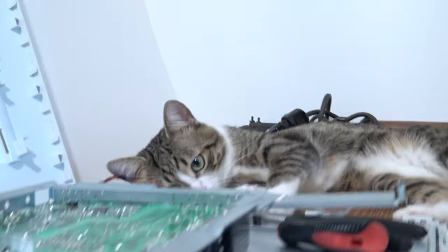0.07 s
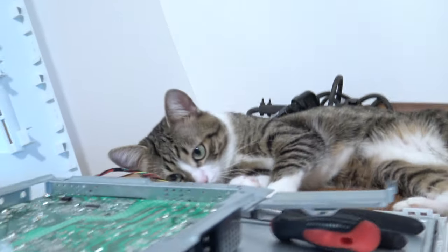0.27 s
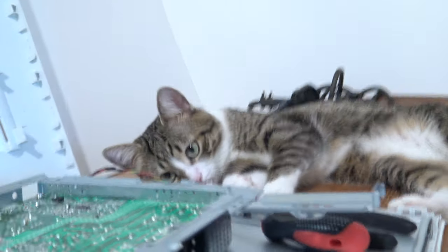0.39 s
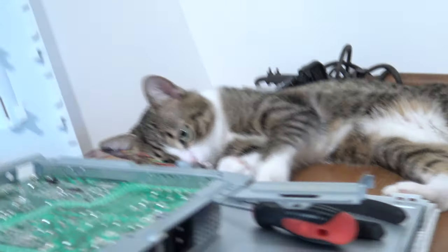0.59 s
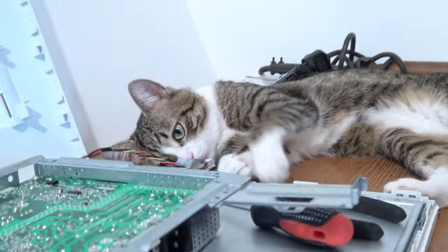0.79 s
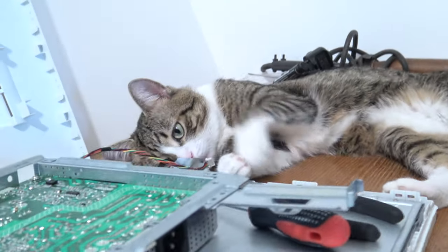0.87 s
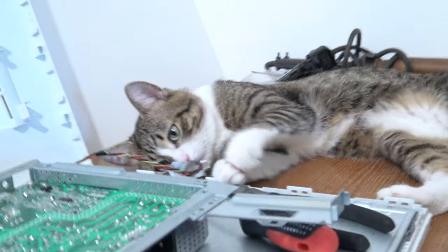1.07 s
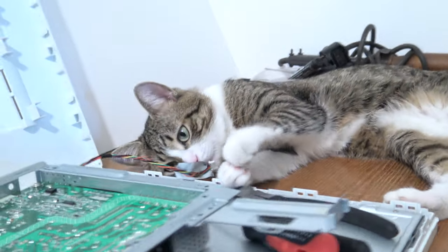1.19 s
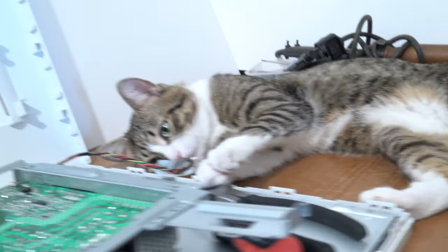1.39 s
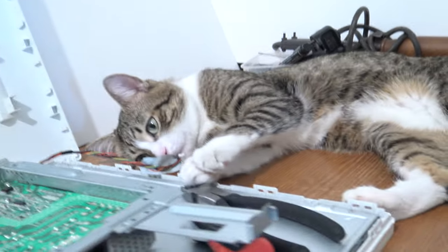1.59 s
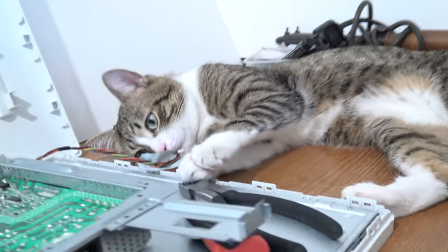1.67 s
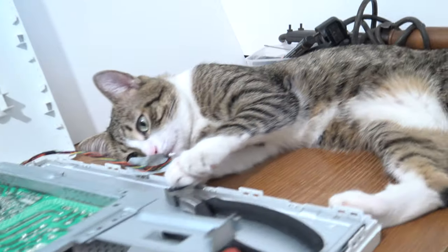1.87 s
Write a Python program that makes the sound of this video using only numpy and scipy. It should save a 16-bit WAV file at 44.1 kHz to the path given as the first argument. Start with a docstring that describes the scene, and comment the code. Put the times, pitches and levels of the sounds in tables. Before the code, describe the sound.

One sharp bright snap comes early, then faint claw ticks, a brief paw scuff, small bracket taps and a dull metal knock; a small quiet room, close microphone, faint lens motor whine in the first second.

```python
"""A cat lying on a wooden floor paws at the wires and sheet metal of an opened appliance, close by.
One sharp snap, claw ticks, bracket taps and chassis knocks: decaying modes and damped noise bursts.
Paw and fur rub as trains of tiny random slips; low decaying tones thump on the floor.
The small room answers with a decaying-noise response, over quiet shaped-noise room tone.
A lens motor whines faintly in pulses for the first second: gated harmonics of its step rate."""
import sys
import numpy as np
from scipy import signal
from scipy.fft import rfft, irfft
from scipy.io import wavfile
from scipy.ndimage import uniform_filter1d

SR = 44100
rng = np.random.default_rng(int(sys.argv[2]) if len(sys.argv) > 2 else 0)


def digitize_waveform(pressure):
    """Quantize a signal to 16-bit integers and store it at the path in sys.argv[1].

    Rows of a 2-D input are taken as channels; values are limited to [-1, 1].
    """
    field = np.atleast_2d(pressure).T
    bounded = np.clip(field, -1, 1)
    quanta = np.round(bounded * 32767).astype(np.int16)
    wavfile.write(sys.argv[1], SR, quanta)


N = 83790

SNAP_S = 0.2082
RADIATE = 0.84  # high-pass corner of a part / its lowest mode


def amp(db):
    """Decibels to gain."""
    return 10 ** (np.asarray(db) / 20)


def unit(x):
    """Scales to rms 1."""
    return x / np.sqrt(np.mean(x ** 2) + 1e-20)


def read(points, hz):
    """Interpolates a table on a log-frequency axis."""
    f, value = np.transpose(points)
    return np.interp(np.log(hz + 1), np.log(f + 1), value)


def coloured(x, points):
    """Filters a signal, zero phase, by a table of levels; rms 1."""
    gain = amp(read(points, np.fft.rfftfreq(len(x), 1 / SR)))
    return unit(irfft(rfft(x) * gain, len(x)))


def panned(x, pan_db):
    """Stereo from mono; pan_db is left minus right."""
    return amp([[pan_db / 2], [-pan_db / 2]]) * x


def widened(pair, side_db):
    """Left and right from a middle and a side signal, the side filtered by a table."""
    mid, side = pair
    gain = amp(read(side_db, np.fft.rfftfreq(len(side), 1 / SR)))
    side = irfft(rfft(side) * gain, len(side))
    return np.array([mid + side, mid - side])


def add(mix, s, sound):
    """Adds a stereo sound at a time in seconds."""
    part = mix[:, max(round(s * SR), 0):][:, :sound.shape[1]]
    part += sound[:, :part.shape[1]]


def decay(t, t60):
    """Exponential decay by 60 dB in t60 seconds."""
    return np.exp(-np.log(1000) * t / t60)


def radiated(x, modes, order):
    """A part hardly radiates below its lowest mode: high-pass."""
    sos = signal.butter(order, RADIATE * modes[0][0], "high", fs=SR, output="sos")
    return signal.sosfilt(sos, x)


def ring(modes, contact_s):
    """Exponentially dying modes that swell over the contact time."""
    t = np.arange(SR // 4) / SR
    swell = 1 - np.exp(-(t / contact_s) ** 2)
    return swell * sum(amp(db - 60 * t / t60) * np.sin(2 * np.pi * hz * t) for hz, db, t60 in modes)


def burst(centre_hz, octaves, t60):
    """A tiny crack: dense, heavily damped ringing around one frequency."""
    size, rise_s = 2048, 0.0001
    t, hz = np.arange(size) / SR, np.fft.rfftfreq(size, 1 / SR)
    offset = np.log2((hz + 1) / centre_hz) / octaves
    bell = 1 / (1 + offset ** 2 / 2) ** 2
    dense = unit(irfft(bell * np.exp(2j * np.pi * rng.random(len(hz)))))
    fade = (1 - np.exp(-t / rise_s)) * decay(t, t60)
    return unit(dense * fade) * np.sqrt(np.mean(fade ** 2))  # rms of the fade


def struck(blows, modes, pan_db):
    """Each blow rings the same modes of one part, shorter the more the paw damps it."""
    out = np.zeros((2, N))
    for s, db, contact_s, damping in blows:
        damped = [(hz, mode_db, t60 / damping) for hz, mode_db, t60 in modes]
        add(out, s, panned(amp(db) * ring(damped, contact_s), pan_db))
    return radiated(out, modes, order=4)


def slips(per_s, colour):
    """Many tiny slips of uneven size and random sign, coloured by what they shake."""
    spread_db = 2.5
    size = amp(spread_db * np.minimum(rng.exponential(1, N), 4))
    hit = rng.random(N) < per_s / SR
    return coloured(hit * rng.choice([-1., 1.], N) * size, colour)


def air():
    """Steady room tone and microphone hiss: coloured stereo noise."""
    level_db = -62.5
    # room tone: f/Hz, level/dB
    air_colour = [(20, -8.5), (50, -5.5), (100, -5.5), (200, -7), (300, -5.5), (380, -11), (500, -8.5),
                  (620, -11), (780, -7), (1070, -12.5), (1190, -5), (1340, -16.5), (2200, -19),
                  (5000, -22.5), (10000, -23.5), (15500, -27.5)]
    # side against middle: f/Hz, level/dB
    air_side = [(60, -17.5), (120, -8), (240, -8.5), (480, -9.5), (950, -11), (1890, -10.5), (3770, -19.5),
                (7520, -1), (15000, -12.5)]
    pair = [coloured(x, air_colour) for x in rng.standard_normal((2, N))]
    return amp(level_db) * unit(widened(pair, air_side))


def lens():
    """The lens motor steps in short, regular runs of uneven strength; its step rate jitters."""
    step_hz, jitter_rms = 1619, 0.0032  # jitter relative to step rate
    runs_per_s, first_s, spread_db = 24.7, 0.045, 2
    swell_s, stop_s = 0.16, 1.07
    # harmonics of the step rate: multiple, level/dB
    partials = [(4, -73.5), (5, -71.5), (6, -76.5)]
    t = np.arange(N) / SR
    cycle = runs_per_s * (t - first_s)
    strength = amp(spread_db * rng.standard_normal(size=64))[np.round(cycle).astype(int)]
    gate = np.cos(2 * np.pi * cycle) > 0
    runs = strength * gate * np.minimum(t / swell_s, 1) * (t < stop_s)
    jitter = jitter_rms * unit(uniform_filter1d(rng.standard_normal(N), size=100))
    turns = np.cumsum(step_hz * (1 + jitter)) / SR
    whine = sum(amp(db) * np.sin(2 * np.pi * k * turns) for k, db in partials)
    return uniform_filter1d(runs, size=150) * whine  # softened run edges


def room(x):
    """Scatter from the near clutter plus a short, nearly central tail, by convolution."""
    tail_db, early_db = -23, -20.5
    early_t60_s, early_delay_s = 0.091, 0.00275
    # tail decay: f/Hz, t60/s
    tail_t60 = [(200, 0.3), (1200, 0.45), (3500, 0.29), (7000, 0.29), (13000, 0.31)]
    # side against middle: f/Hz, level/dB
    room_side = [(150, -13), (900, -10), (2800, -17), (5000, -23.5), (8000, -16), (13000, -11.5)]
    hz, t, z = signal.stft(rng.standard_normal((2, SR // 2)), SR, nperseg=256)
    faded = z * decay(t, read(tail_t60, hz)[:, None])
    tail = signal.istft(faded, SR, nperseg=256)[1]
    t = np.arange(tail.shape[1]) / SR
    early = rng.standard_normal(tail.shape) * (t > early_delay_s) * decay(t, early_t60_s)
    response = amp(tail_db) * tail / np.linalg.norm(tail[0])
    response = response + amp(early_db) * early / np.linalg.norm(early[0])
    return signal.fftconvolve(x.mean(0)[None], widened(response, room_side), axes=1)[:, :N]


def ports(x):
    """Direct sound reaches two microphone ports with slightly different level and phase."""
    # left minus right: f/Hz, level/dB
    balance = [(200, 0.1), (1000, -0.5), (2500, 0.7), (5000, 0), (7000, -6), (9000, 0), (12500, -2)]
    # left's lead: f/Hz, phase/rad
    lead = [(200, 0.076), (6800, -0.24), (9000, -0.85), (13000, -0.85)]
    hz = np.fft.rfftfreq(N, 1 / SR)
    half = amp(read(balance, hz) / 2) * np.exp(.5j * read(lead, hz))
    return irfft(rfft(x) * np.array([half, 1 / half]), N)


def thumps():
    """The paw's weight lands on the wooden floor: soft, low decaying tones."""
    # landings: t/s, level/dB, f/Hz, t60/s
    landings = [(0.912, -35, 105, 0.087), (.99, -55, 55, 0.15), (1.69, -47, 134, 0.059)]
    out = np.zeros((2, N))
    for s, db, hz, t60 in landings:
        add(out, s, panned(ring([(hz, db, t60)], contact_s=0.0041), 0))
    return out


def rub():
    """The paw drags over the chassis: low scuff in surges under fur hiss, after a light rustle."""
    # cat shifts its weight before reaching out
    shift_s, shift_sigma_s, shift_db, rustle_db = 0.81, 0.19, -67.5, -72.5
    # full fur contact, dB slopes outside it
    start_s, end_s, fur_db, rise_db_per_s, fall_db_per_s = 0.9176, 0.99, -50.5, 385, 752
    surge_slips_per_s, fur_slips_per_s = 2300, 4500
    # pushes along the chassis: t/s, level/dB, Gaussian sigma/s
    surges = [(0.904, -45.5, 0.0024), (0.928, -36, 0.0081), (0.945, -37.5, 0.0096), (0.97, -35.5, 0.0097)]
    # scuff spectrum: f/Hz, level/dB
    scuff_colour = [(30, -23), (80, -28.5), (125, -2.5), (155, 0), (205, -6.5), (255, -9), (315, -3.5),
                    (375, -18), (470, -7.5), (650, -20), (1200, -23.5), (2500, -30.5), (6000, -63)]
    # fur spectrum: f/Hz, level/dB
    fur_colour = [(200, -18.5), (900, 6), (3700, -1.5), (5600, -4.5), (6550, -0.5), (7600, -4), (9900, -3),
                  (12500, -14.5), (16000, -19)]
    # scuff side against middle: f/Hz, level/dB
    scuff_side = [(200, -20), (1200, -10), (2500, -42)]
    t = np.arange(N) / SR
    shift = np.exp(-((t - shift_s) / shift_sigma_s) ** 2 / 2)
    power = sum((amp(db) * np.exp(-((t - s) / sigma) ** 2 / 2)) ** 2 for s, db, sigma in surges)
    push = np.sqrt(power) + amp(shift_db) * shift
    rise_db = rise_db_per_s * np.maximum(start_s - t, 0)
    fall_db = fall_db_per_s * np.maximum(t - end_s, 0)
    contact = amp(fur_db - rise_db - fall_db)
    scuff = widened([slips(surge_slips_per_s, scuff_colour) for _ in range(2)], scuff_side)
    fur = slips(fur_slips_per_s, fur_colour)
    return push * scuff + (contact + amp(rustle_db) * shift) * fur


def knocks():
    """Soft paw knocks ring the low modes of the chassis."""
    # blows: t/s, level/dB, contact time/s, damping by the paw/x
    blows = [(.7355, -48, 0.00058, 2.9), (1.03, -44, 0.00084, 2.4), (1.599, -45, 0.0011, 0.75),
             (1.6033, -27, 0.0018, 1), (1.6915, -39.5, 0.0013, 0.94), (1.809, -55, 0.00044, 1.4)]
    # chassis modes: f/Hz, level/dB, t60 at damping 1/s
    modes = [(298, -7.5, 0.061), (340, 7.5, 0.015), (448, -2.3, 0.022), (970, -18.5, 0.043),
             (1415, -29.5, 0.07)]
    return struck(blows, modes, pan_db=-3)


def taps():
    """Small taps ring the modes of a metal bracket."""
    # blows: t/s, level/dB, contact time/s, damping by the paw/x
    blows = [(1.0305, -45, 0.00052, 2.5), (1.0358, -39.5, 0.0006, 1.24), (1.0483, -45.5, 0.0011, 1.2),
             (1.4295, -52, 0.0015, 0.66)]
    # bracket modes: f/Hz, level/dB, t60 at damping 1/s
    modes = [(807, -9, 0.053), (920, 4, 0.03), (1497, -1.5, 0.035), (2840, -17, 0.056)]
    return struck(blows, modes, pan_db=-3.5)


def ticks():
    """Claws and wire ends click and scratch against metal: damped noise bursts."""
    # clicks: t/s, level/dB, centre f/Hz, width/octaves, t60/s, left minus right/dB
    clicks = [(0.328, -57.5, 1150, 0.95, 0.2, -1.5), (.3625, -55, 3100, 1.2, 0.026, 0.5),
              (0.5422, -51.5, 1730, 1.5, 0.027, -0.5), (0.8166, -36.5, 5350, 0.73, 0.0077, 2),
              (.8178, -49, 1740, 0.73, 0.025, -1), (0.8898, -44.5, 7600, 0.7, 0.0035, 15),
              (0.9995, -38, 5560, 0.88, 0.012, -0.5), (1.029, -59.5, 2200, 1.8, 0.18, 0),
              (1.4297, -59, 2590, 0.66, 0.019, -1), (1.5773, -48, 2770, 1.17, 0.012, 1),
              (1.6039, -54.5, 1750, 0.98, 0.047, -1.5), (1.608, -51, 6700, 0.11, 0.006, 1),
              (1.644, -46, 4060, 0.63, 0.012, 1.5), (1.868, -52, 1030, 0.47, 0.023, -3.5)]
    out = np.zeros((2, N))
    for s, db, hz, octaves, t60, pan_db in clicks:
        add(out, s, panned(amp(db) * burst(hz, octaves, t60), pan_db))
    return out


def spray():
    """Broader crack the snap radiates away from the microphone, heard only from the walls."""
    level_db = 1.5
    # crack spectrum: f/Hz, level/dB
    spray_colour = [(500, -14), (2300, -5), (2950, 10), (4500, 5.5), (5500, 6.5), (7000, -17), (8000, 10),
                    (9300, -6), (12700, -7), (15500, -6.5)]
    out = np.zeros((2, N))
    add(out, SNAP_S, np.ones((2, 1)))
    return amp(level_db) * coloured(out[0], spray_colour) / np.sqrt(N)  # unit-energy pulse


def snap():
    """A wire or clip slips free and strikes a hard part: ringing modes plus a noise crack."""
    rise_s, pan_db, crack_db = 0.0007, 2, -17.5
    # modes of the part: f/Hz, level/dB, t60/s
    modes = [(841, -35, 0.041), (1009, -16.5, 0.012), (1223, -20.5, 0.023), (2400, -39, 0.02),
             (2945, -41, 0.044), (3020, -20, 0.008), (3887, -22.5, 0.012), (5000, -28.5, 0.018),
             (6430, -9.5, 0.0069), (6680, -2, 0.0044), (7814, -9, 0.0052), (8150, -15.5, 0.0066),
             (10660, -9, 0.0038), (11900, -12.5, 0.0044)]
    crack = amp(crack_db) * burst(centre_hz=4470, octaves=0.95, t60=0.0057)
    out = np.zeros((2, N))
    add(out, SNAP_S, panned(ring(modes, rise_s), pan_db))
    add(out, SNAP_S, panned(crack, pan_db))
    return radiated(out, modes, order=1)


def scene():
    """All contacts in the room, over the quiet background."""
    near = thumps() + rub() + knocks() + taps() + ticks() + snap()
    return air() + lens() + room(near + spray()) + ports(near)


def record(dry):
    """Band limit: linear-phase low-pass."""
    edge_hz = 15850
    lowpass = signal.firwin(511, edge_hz, window=("kaiser", 9), fs=SR)
    return signal.oaconvolve(dry, lowpass[None], "same")


dry = scene()
out = record(dry)
digitize_waveform(out)
```